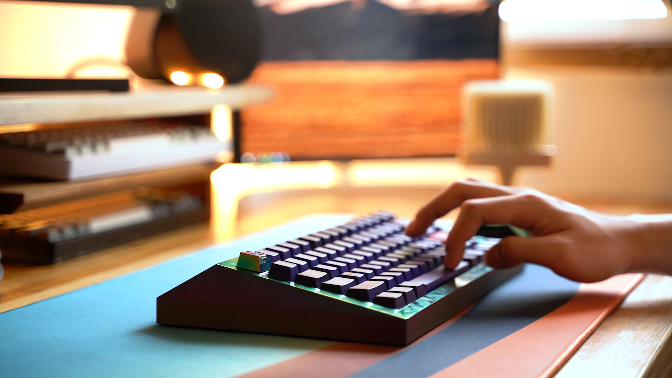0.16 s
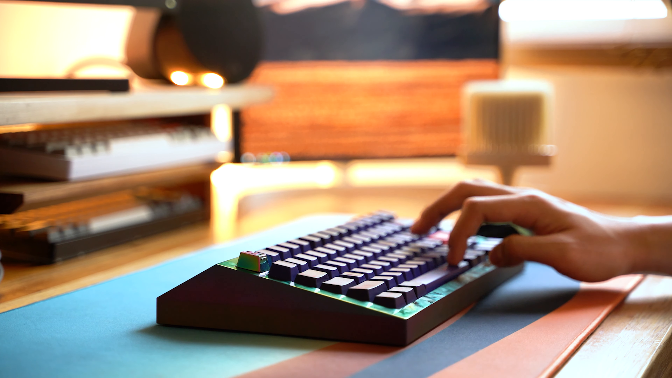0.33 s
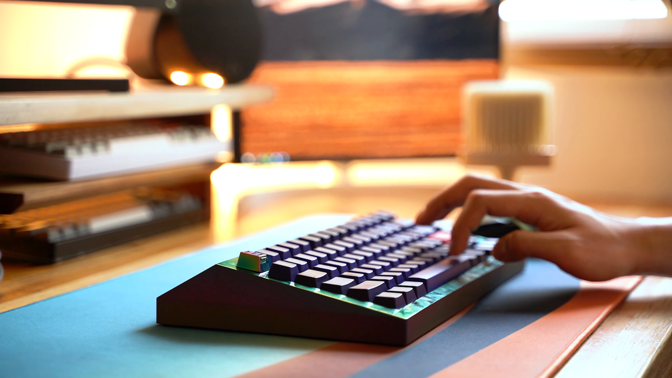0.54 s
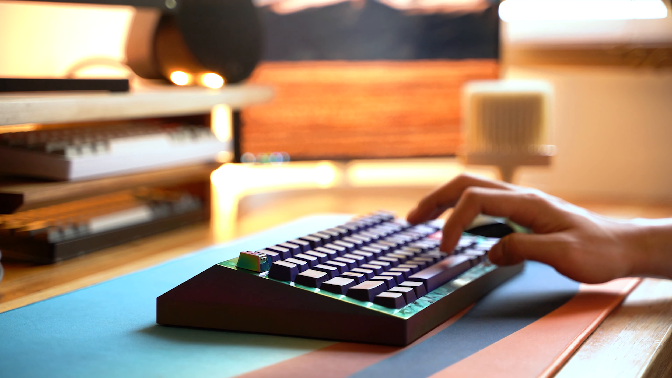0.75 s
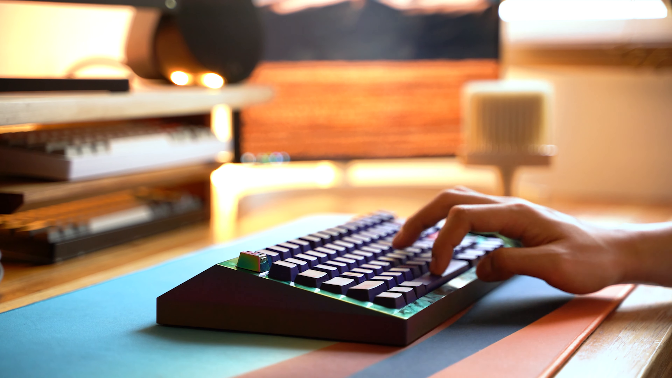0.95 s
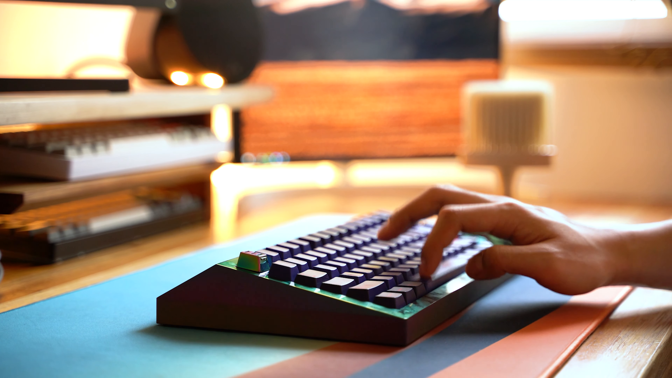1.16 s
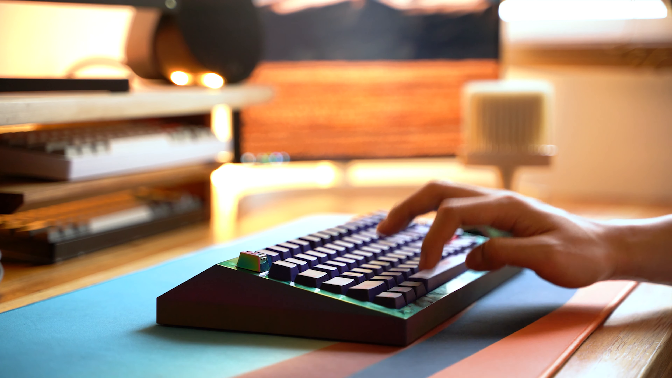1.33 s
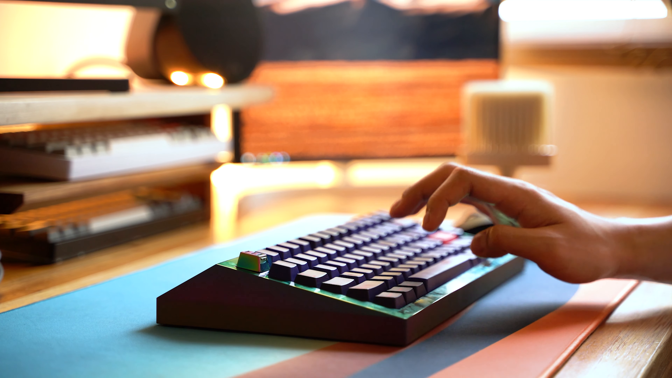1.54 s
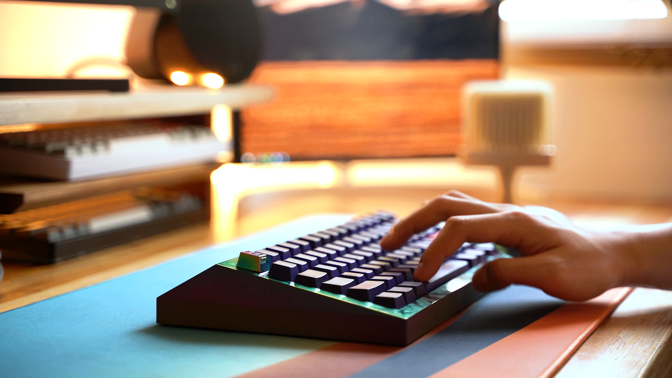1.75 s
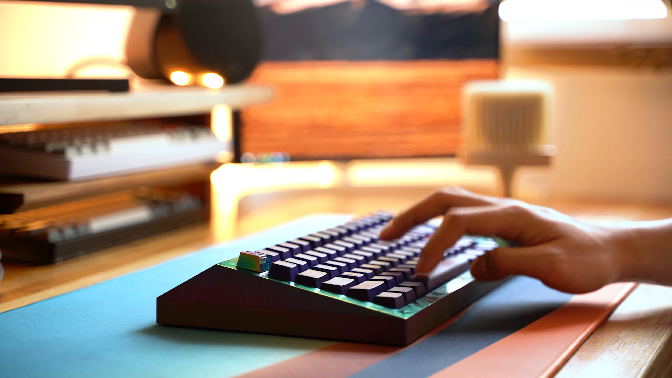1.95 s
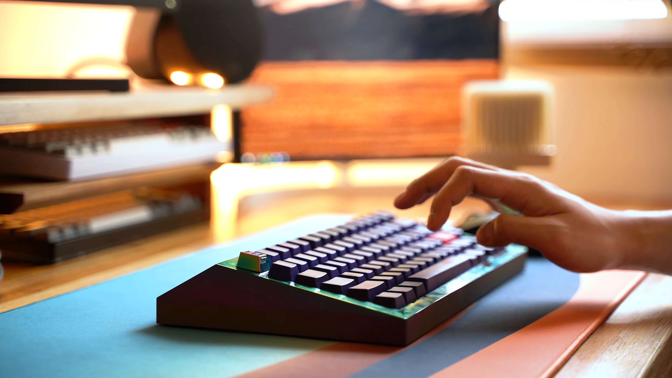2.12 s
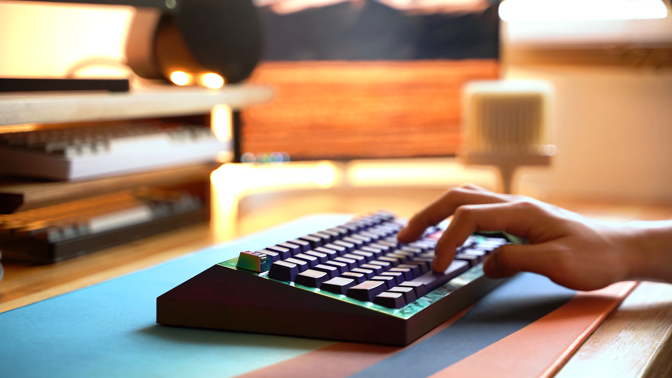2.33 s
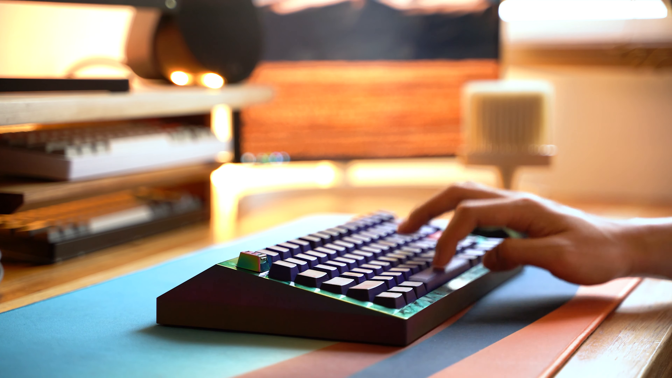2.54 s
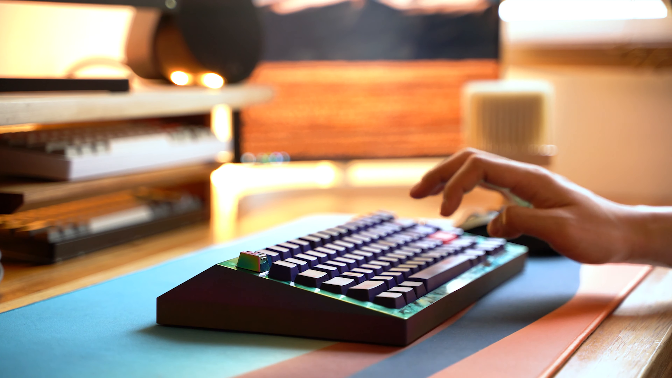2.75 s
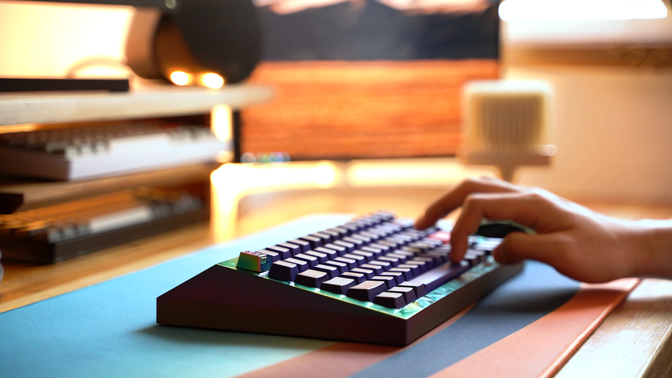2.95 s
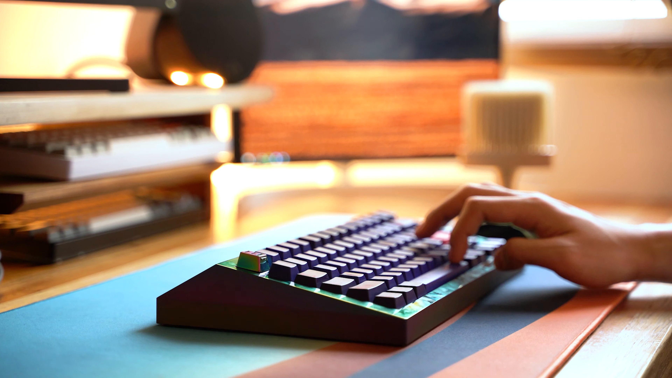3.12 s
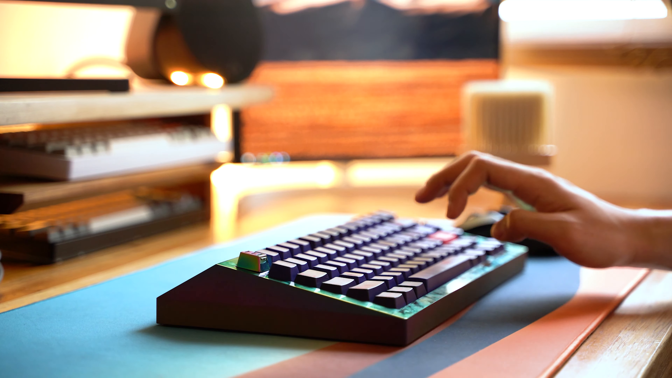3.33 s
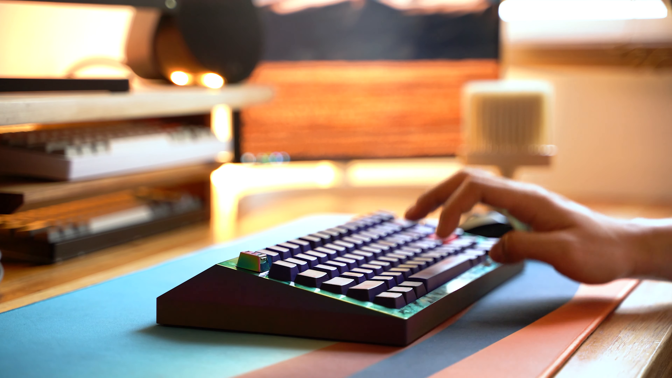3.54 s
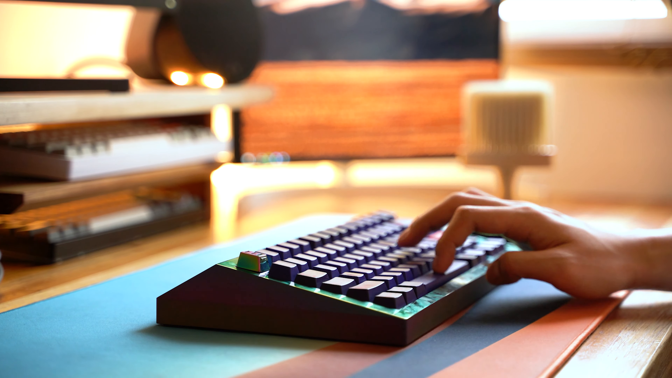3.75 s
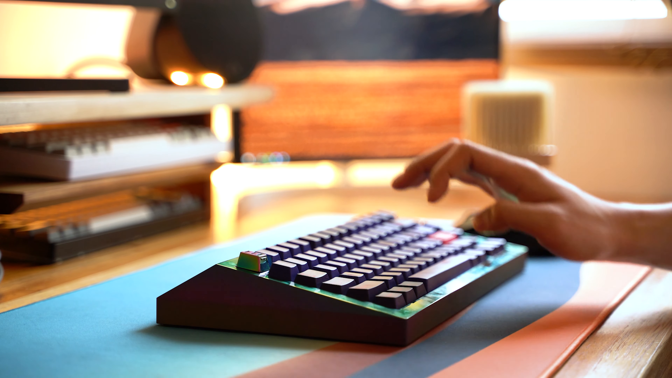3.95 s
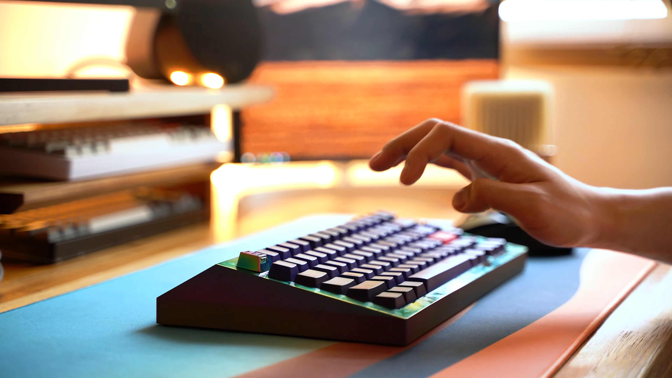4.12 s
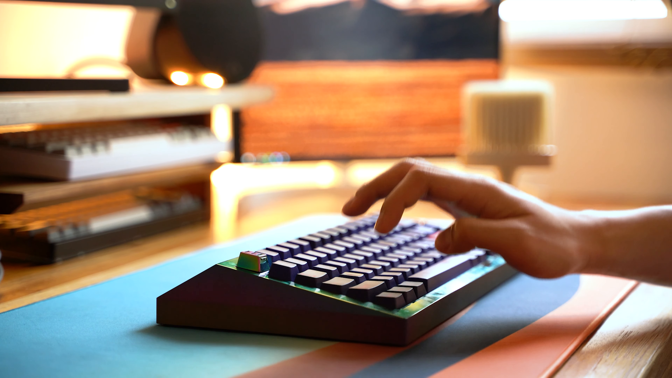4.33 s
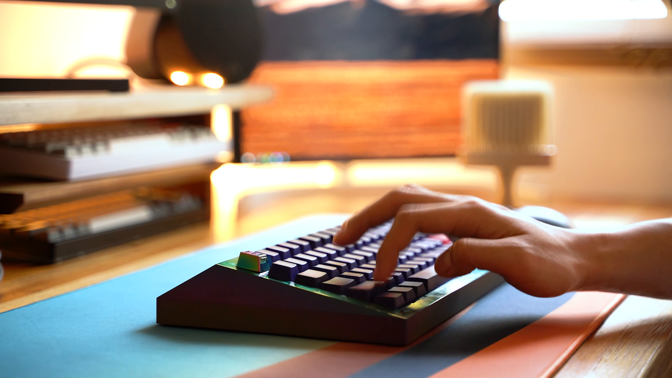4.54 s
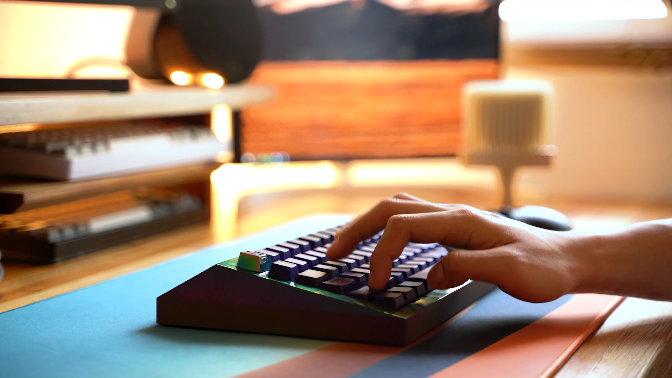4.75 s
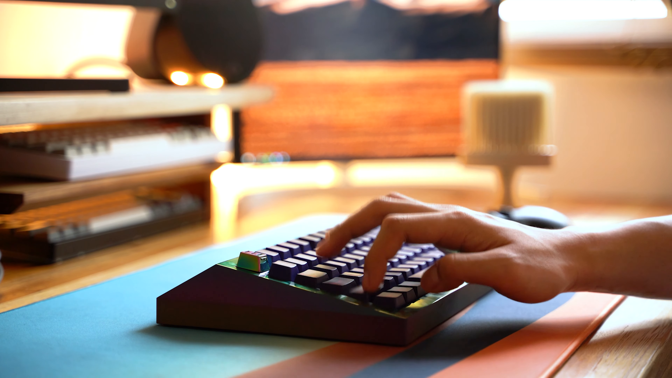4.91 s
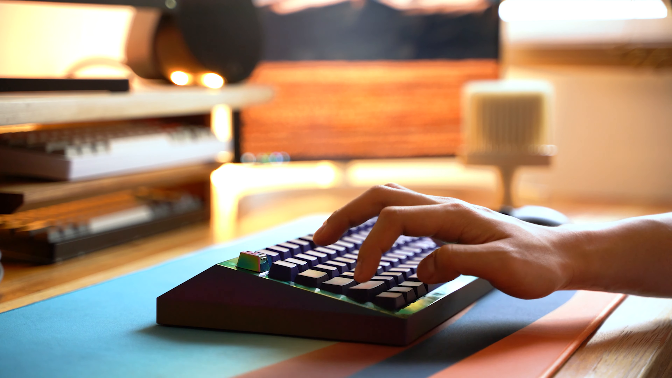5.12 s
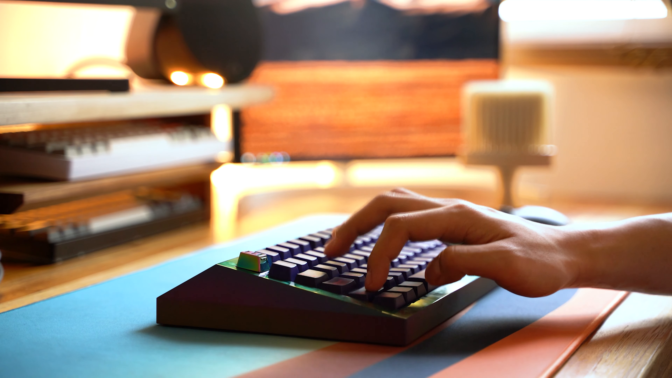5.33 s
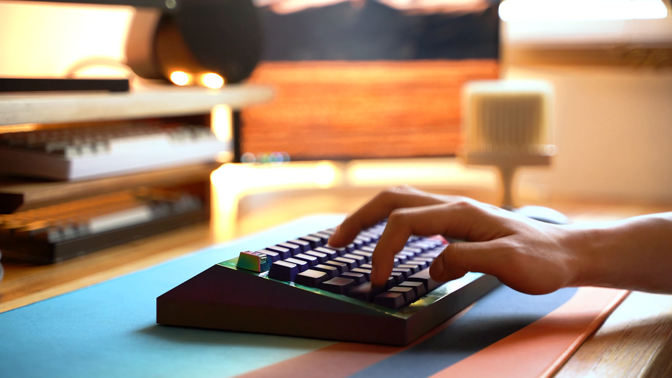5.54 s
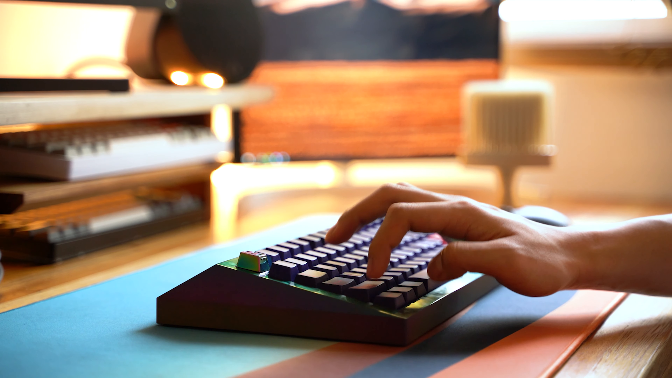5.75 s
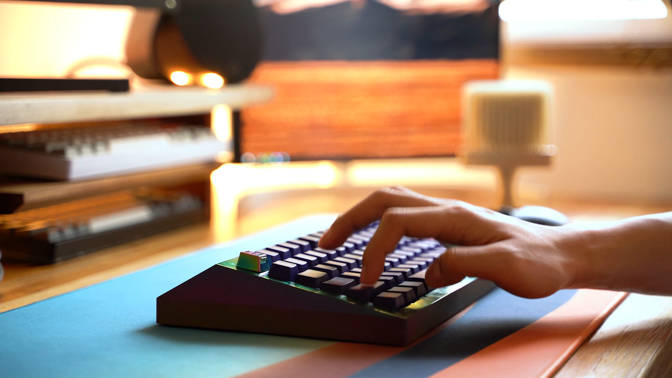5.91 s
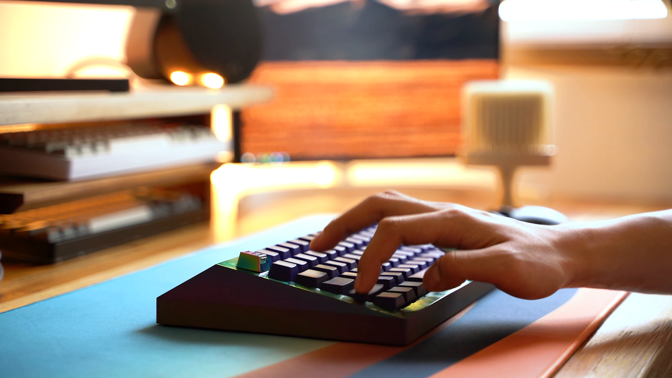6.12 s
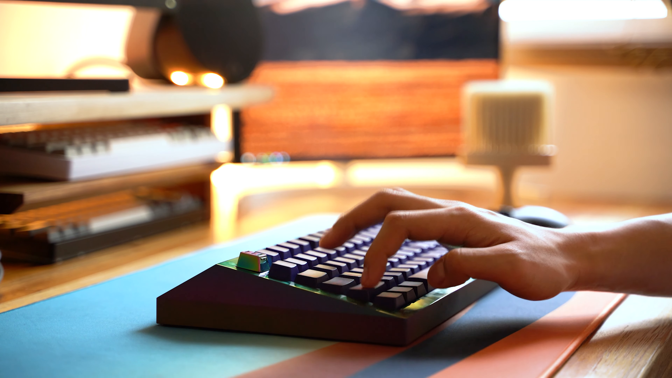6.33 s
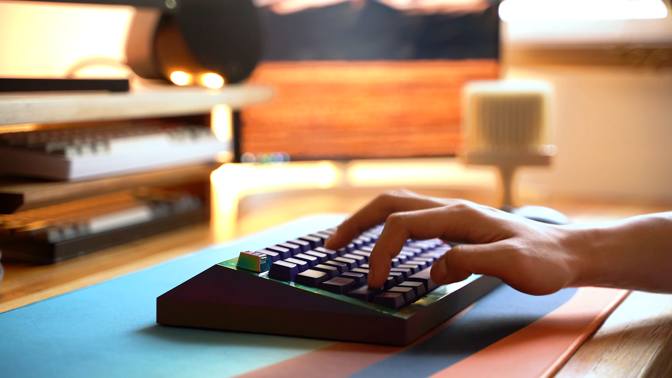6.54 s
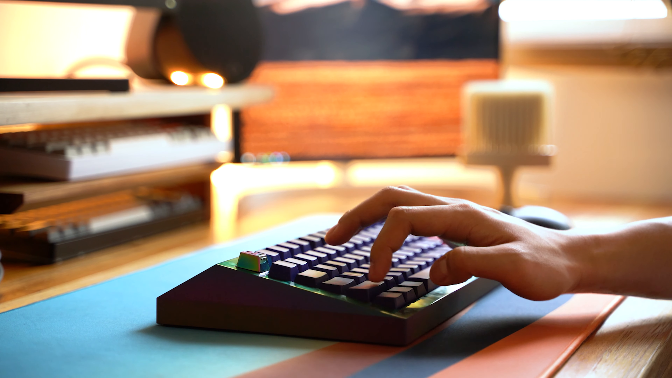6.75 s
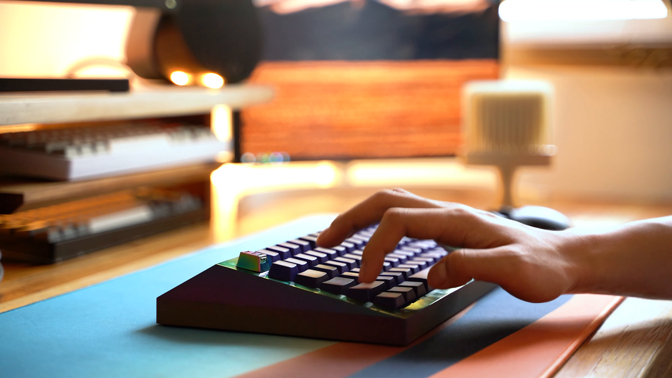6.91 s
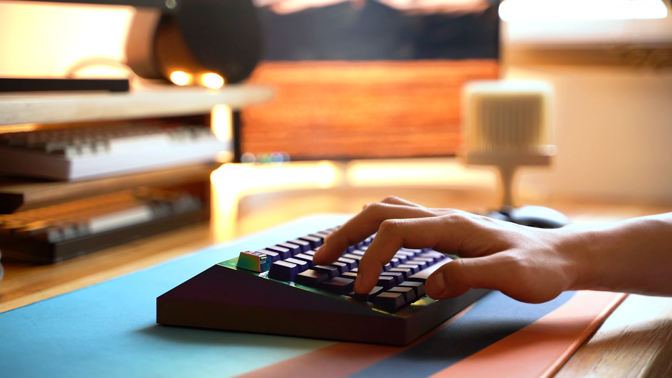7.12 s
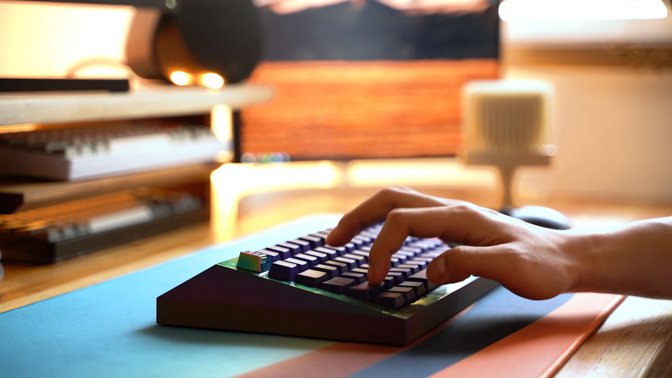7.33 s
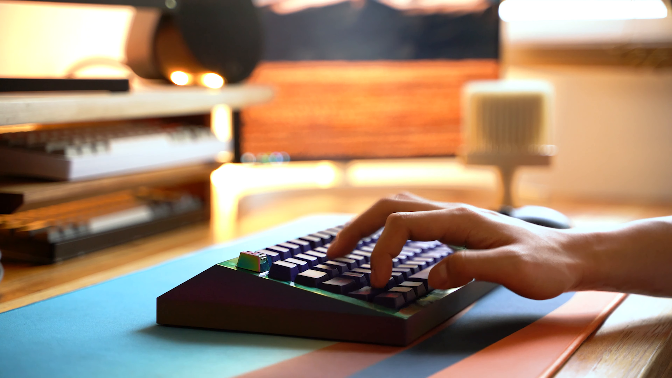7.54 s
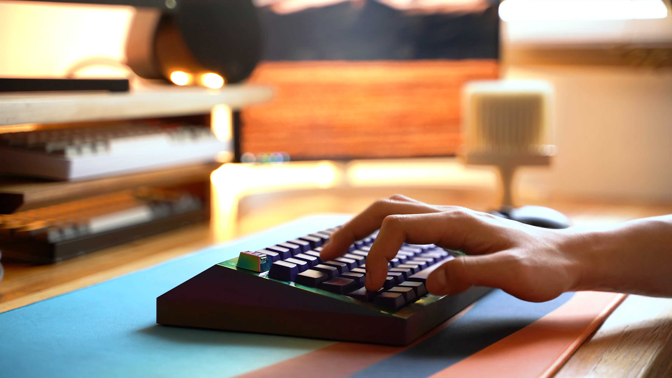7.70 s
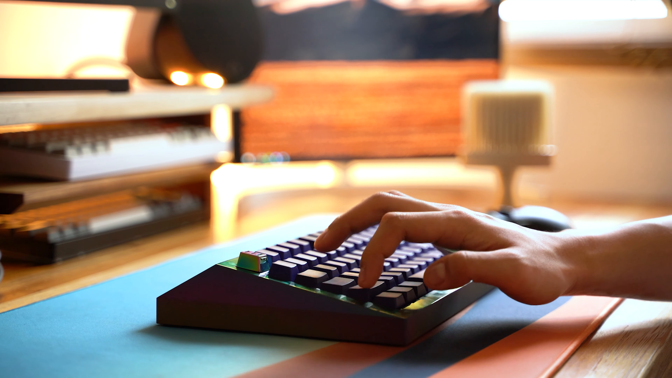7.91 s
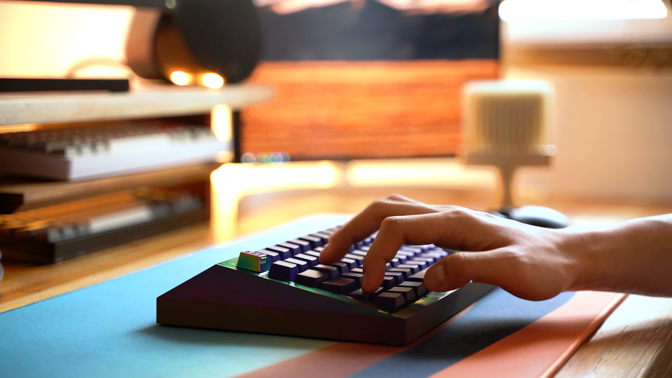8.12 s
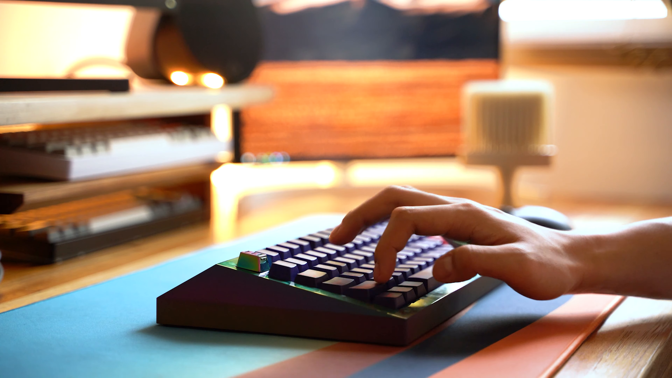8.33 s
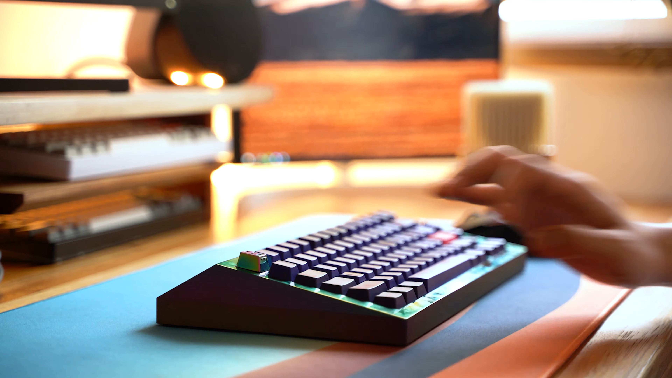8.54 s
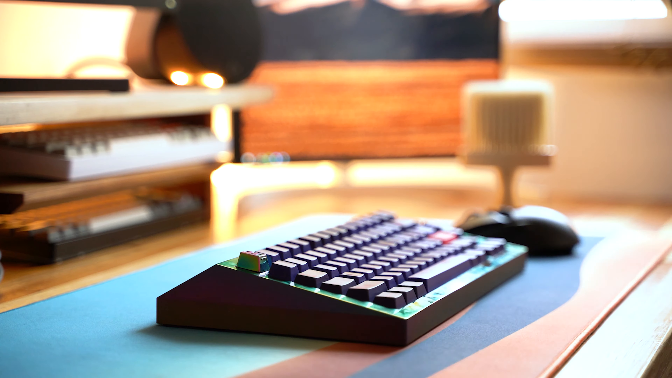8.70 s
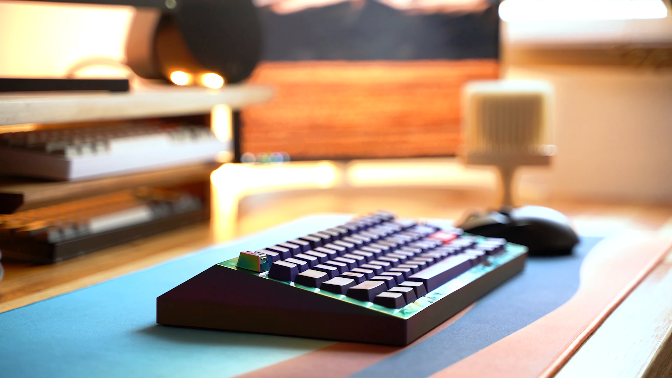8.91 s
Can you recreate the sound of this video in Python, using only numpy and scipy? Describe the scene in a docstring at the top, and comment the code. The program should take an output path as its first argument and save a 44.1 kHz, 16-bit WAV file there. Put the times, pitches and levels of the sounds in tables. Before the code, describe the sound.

Space bar of a mechanical keyboard clacks deeply in quick bursts, then lighter letter keys click in a steady run, close up in a quiet room.

```python
"""A small quiet room: one hand tries out a mechanical keyboard on a desk mat, close to a microphone.
The space bar is tapped in bursts: a deep clack going down, a clack and wire chatter coming up.
Letter keys follow, lighter and brighter, and some springs ping. A fan hums faintly.
Blows excite damped modes (filtered impulses), the stem scratches as a train of grains, springs ring as
narrow-band noise, the fan is shaped noise; an echo and a diffuse tail carry the blows to the microphone."""
import sys
import numpy as np
from scipy import signal
from scipy.fft import rfft, irfft
from scipy.io import wavfile

SR = 44100
rng = np.random.default_rng(int(sys.argv[2]) if len(sys.argv) > 2 else 0)


def materialize(psi):
    """Save the field psi as 16-bit PCM at rate SR to the path in sys.argv[1].

    A 1-D psi becomes a single channel; in a 2-D psi each row is a channel.
    """
    bounded = np.clip(np.atleast_2d(psi).T, -1, 1)
    quanta = np.round(bounded * 32767).astype(np.int16)
    wavfile.write(sys.argv[1], SR, quanta)


N = 395577  # samples in the scene
SIZE = 4096  # samples in one blow
FREQ = np.maximum(np.arange(SIZE // 2 + 1) * SR / SIZE, 1)
LEAD_S = .03  # room left ahead of each landing for the scratch of the stem

# resonances of the space bar on the plate: (f/Hz, width/Hz, level/dB)
BAR_MODES = [(260, 160, -41), (419, 100, -22.5), (713, 280, -24), (1243, 290, -10), (1698, 468, 2),
             (2100, 390, -6.5), (2786, 190, -8), (3423, 400, -9), (4700, 1000, -22.5), (6650, 500, -30),
             (9900, 4900, -34), (13676, 2276, -43.5)]
# taps: (down t/s, strength/dB re usual tap, up t/s, release strength/dB, wire level/dB)
BAR_TAPS = [(-.04, 0.5, 0.044, -9, 8), (0.111, -1, 0.19, 4, 17), (.2778, -1.4, 0.35, -6, 13),
            (0.4325, -3, .504, -10.5, 14), (.5955, -2.5, .6654, -14, 12), (.754, 0.5, .827, 6, 16),
            (.9233, -0.9, 1.0014, -13.5, 6.5), (1.0746, -1, 1.155, -1.5, 14.5),
            (1.2465, 0.5, 1.3097, -10, 13), (1.3893, 1, 1.46, 10, 17.5), (1.857, 3, 1.937, 0.5, 15),
            (2.0238, 2, 2.092, 2, 15.5), (2.44, 2.5, 2.5206, 2.5, 10.5), (2.6059, 1, 2.6841, 2.5, 16),
            (3.0948, -5.5, 3.157, -9, 3), (3.236, -4.5, 3.3218, 9.5, 17.5), (3.7233, 4, 3.8024, 5.5, 13),
            (3.8678, 2, 3.9541, 3, 18.5)]
# once the bar rebounds and knocks against its top stop again: (t/s, level/dB, treble level/dB)
BAR_REBOUND = (2.691, 15.6, -16)


def space_bar():
    """Impact excitation of a bar's modes, at the bottom and at the top of each stroke."""
    out = np.zeros(N)
    path = room(wet_db=-3.5, echo_s=.0048, echo_db=4.5)
    for down, press_db, up, release_db, wire_db in BAR_TAPS:
        add(out, down - LEAD_S, heard(bar_press(press_db), path))
        add(out, up - LEAD_S, heard(bar_release(release_db, wire_db), path))
    s, level_db, treble_db = BAR_REBOUND
    contact_db = level_db + np.array([0, 0, treble_db, treble_db])
    add(out, s, heard(clack(BAR_MODES, contact_db, uneven_db=1.5), path))
    return out


# bar going down; a row each for low body, middle, click, top: (usual level/dB, growth/dB per dB of strength)
BAR_PRESS_VOICE = [(16.5, .4), (16, 1), (18, 1.5), (15, 0.83)]


def bar_press(press_db):
    """Friction, then impact: the stem scratches until the bar lands with a clean clack."""
    stroke = slide(BAR_MODES, level_db=press_db - 12.5, travel_s=0.012, bright_db=12.5)
    landing = clack(BAR_MODES, voiced(BAR_PRESS_VOICE, press_db), detune=0.008, uneven_db=1.35,
                    ring_s=0.0013, dense_hz=4700, thump_db=2.5)
    add(stroke, LEAD_S, landing)
    return stroke


# bar coming up; rows and columns as above: (usual level/dB, growth/dB per dB of strength)
BAR_RELEASE_VOICE = [(20.4, 0.55), (10.7, 0.99), (9.1, .2), (15, .3)]
# the thump of the case follows the force only in part: dB it falls behind the middle per dB of strength
THUMP_LAG = 0.42


def bar_release(release_db, wire_db):
    """Friction, impact and secondary impacts: a scratch, a clack, then the chatter of the loose wire."""
    stroke = slide(BAR_MODES, level_db=-16.5, travel_s=0.021, bright_db=12)
    landing = clack(loaded(BAR_MODES, release_db), voiced(BAR_RELEASE_VOICE, release_db), detune=0.045,
                    uneven_db=1.5, ring_s=0.0026, dense_hz=3223, thump_db=-1.5 - THUMP_LAG * release_db)
    add(stroke, LEAD_S, landing)
    wire_chatter(stroke, release_db, wire_db)
    return stroke


# pitch ratio of the main resonances at a usual release, and its rise per dB of strength
RELEASE_PITCH, RELEASE_PITCH_PER_DB = .94, 0.013
LOADED_FROM_HZ, LOADED_TO_HZ = 1000, 2400  # main resonances, which the finger shifts


def loaded(modes, strength_db):
    """Mass loading: the main resonances follow the release strength; the softer the release, the more the
    finger rides the bar and the lower they sit, while a hard release raises them slightly."""
    pitch = RELEASE_PITCH + RELEASE_PITCH_PER_DB * strength_db
    return [(hz * pitch if LOADED_FROM_HZ < hz < LOADED_TO_HZ else hz, width, db)
            for hz, width, db in modes]


# colour of the steel wire striking its clips: low body, middle, click, top (each level/dB)
WIRE_COLOUR_DB = [-1, -14, -0.5, 0.5]
# mean delay of the wire after a usual release (s), and how much sooner it comes after a harder one (s per dB)
WIRE_DELAY_S, WIRE_SOONER_S_PER_DB = .0043, .00006


def wire_chatter(stroke, release_db, wire_db, spread_s=.002, count=10):
    """Repeated impacts: the stabiliser wire bounces in its clips as ticks, mostly loudest mid-cluster."""
    delay = WIRE_DELAY_S - WIRE_SOONER_S_PER_DB * release_db
    chance = rng.standard_normal((count, 2))
    size = np.exp(-chance[:, 0] ** 2 / 4) * chance[:, 1]
    size = size / np.sqrt(np.sum(size ** 2))
    for offset, gain in zip(spread_s * chance[:, 0], size):
        tick = clack(BAR_MODES, wire_db + np.array(WIRE_COLOUR_DB), uneven_db=3.0, ring_s=.0016)
        add(stroke, LEAD_S + max(delay + offset, 0), gain * tick)


# letter strokes; body is how full the cap sounds, click how sharply it lands, spring how freely its coil
# rings: (down t/s, strength/dB, up t/s, release strength/dB, body/dB, click/dB, spring 0-1)
LETTER_STROKES = [(4.5479, 5, 4.6102, 10, -0.5, -0.5, 0), (4.7026, -.5, 4.7699, 4, 0, -3.5, 0),
                  (4.8408, -2, 4.919, -3, 3.5, -0.5, 0), (4.9924, -8, 5.0687, 4, 3, 4, .9),
                  (5.1583, 4, 5.2313, 1.5, -19, 2.5, 0.6), (5.3162, -1, 5.3806, 4.5, -16, -2, .8),
                  (5.4698, 1, 5.5429, -3.5, 1.5, -7.5, .4), (5.6166, 3, 5.6928, -3, -10.5, 1, 0),
                  (5.7749, 3.7, 5.8459, 1, -9.5, -2, 0), (5.923, 1, 6.0004, -2.5, 2, -0.5, 0.1),
                  (6.0848, 1, 6.155, -32, -21, 0, .6), (6.2181, -4.5, 6.2903, -16.5, -19, -6, 0),
                  (6.3607, -2, 6.4305, -7.5, -21, 5.5, 0.1), (6.5014, -2.5, 6.5705, -6, 6, -9, 0),
                  (6.6403, 4.5, 6.7018, 6, -10.5, 0.5, 0), (6.795, 9.5, 6.8711, -5, -13, 3.5, 0),
                  (6.942, -5, 7.0143, 0, 3.5, 7, .8), (7.0987, 2.5, 7.17, -30, -18, 1, .9),
                  (7.251, 1, 7.3107, 6, -26, -4, 0.15), (7.395, 0, 7.479, -13, 5, -0.5, 0),
                  (7.528, 4, 7.5935, -5, -6, 5, 0), (7.6714, 4, 7.7441, -1.5, -5, 7, 0),
                  (7.8186, -1, 7.8871, -1, 5.5, 0, 0.2), (7.9645, -7, 8.0501, -9.5, -5, 4.5, .5),
                  (8.114, -10, 8.1758, 8.5, -7, 2.5, 0.9), (8.2534, -1, 8.3192, 1.5, 7, -1, 0),
                  (8.403, 1.3, 8.463, -6.5, -4.5, -1, 0), (8.5094, 5.5, 8.5634, 13.5, -5.5, -1, 0)]


def letter_keys(spots=8):
    """Impact excitation of small caps: a click at the bottom of the travel, a duller knock at the top."""
    out = np.zeros(N)
    # each stroke takes one of several paths to the microphone, at random
    paths = [room(wet_db=-2.5, echo_s=.004 + 0.000994 * rng.standard_normal(), echo_db=5.5)
             for _ in range(spots)]
    for down, press_db, up, release_db, body_db, click_db, spring in LETTER_STROKES:
        path = paths[rng.integers(spots)]
        add(out, down - LEAD_S, heard(cap_press(press_db, body_db, click_db), path))
        add(out, up, heard(cap_release(release_db, spring), path))
    faint_ticks(out, paths)
    return out


# resonances of a letter cap on the plate: (f/Hz, width/Hz, level/dB)
LETTER_MODES = [(395, 130, -18), (887, 397, -10.5), (1172, 120, -9), (1939, 462, 3.5), (2763, 132, -1.5),
                (3340, 496, -5.5), (4635, 920, -14), (5160, 260, -23), (5540, 1800, -21), (8850, 1100, -29),
                (12750, 2700, -34)]
# cap going down; a row each for low body, middle, click, top: (usual level/dB, growth/dB per dB of strength)
CAP_PRESS_VOICE = [(2.9, 0.86), (2.8, 0.95), (3.1, 0.86), (6.1, 1)]
# dB gained in low body, middle, click, top per dB of a cap's body, and per dB of its click
BODY_GAIN = [1, 0, 0.083, .33]
CLICK_GAIN = [0, 0, 0.81, 0.43]


def cap_press(press_db, body_db, click_db):
    """Friction, then impact: the stem scratches until the cap clicks at the bottom."""
    stroke = slide(LETTER_MODES, level_db=press_db - 22.5, travel_s=0.012, bright_db=3.5)
    contact_db = voiced(CAP_PRESS_VOICE, press_db)
    contact_db = contact_db + body_db * np.array(BODY_GAIN) + click_db * np.array(CLICK_GAIN)
    landing = clack(LETTER_MODES, contact_db, detune=0.024, uneven_db=1.16, ring_s=0.00086,
                    dense_hz=4190, thump_db=-1 - THUMP_LAG * press_db)
    add(stroke, LEAD_S, landing)
    return stroke


# cap coming up; rows and columns as above: (usual level/dB, growth/dB per dB of strength)
CAP_RELEASE_VOICE = [(3.5, 0.62), (0, 1), (-9, 0.92), (-3, 1)]
FREE_SPRING_TOP_DB = -7  # a switch whose spring rings freely closes with a duller top


def cap_release(release_db, spring, settle_s=0.00211, settle_db=-10):
    """Impact with rebound: the cap knocks at the top and settles with one small bounce."""
    contact_db = voiced(CAP_RELEASE_VOICE, release_db)
    contact_db = contact_db + spring * np.array([0, 0, 0, FREE_SPRING_TOP_DB])
    knock = clack(LETTER_MODES, contact_db, detune=0.029, uneven_db=0.54, ring_s=0.0009,
                  dense_hz=3330, thump_db=0.8 - THUMP_LAG * release_db)
    # the bounce follows 1 to 1.5 times settle_s later
    add(knock, settle_s * (1 + rng.random() / 2), undb(settle_db) * knock)
    return knock


# faint ticks, perhaps of a fingertip, just before a key or the space bar moves: (t/s, level/dB)
FAINT_TICKS = [(3.151, -6), (4.54, -13), (4.682, -16), (4.823, -15), (5.448, -19), (6.615, -21),
               (6.783, -15)]
TICK_TREBLE_DB = -3


def faint_ticks(out, paths):
    """Soft impact: a faint tick excites the modes of a cap with less treble."""
    for s, db in FAINT_TICKS:
        contact_db = db + TICK_TREBLE_DB * np.array([0, 0, 1, 1])
        tick = clack(LETTER_MODES, contact_db, ring_s=0.0018, dense_hz=1200)
        add(out, s, heard(tick, paths[rng.integers(len(paths))]))


SPRING_HZ, SPRING_WIDTH_HZ, SPRING_T60_S = 5120, 130, 0.14  # band in which the coils ring
PING_DB, PING_GROWTH = -62, .3  # level of a free spring after a usual blow, dB gained per dB of strength


def springs():
    """Modal density: a coil's many close modes ring on as decaying narrow-band noise after each blow."""
    out = np.zeros(N)
    t = np.arange(SR // 2) / SR
    freq = np.maximum(np.arange(len(t) // 2 + 1) * SR / len(t), 1)
    band = resonance(freq, SPRING_HZ, SPRING_WIDTH_HZ)
    decay = np.exp(-np.log(1000) * t / SPRING_T60_S)
    for down, press_db, up, release_db, _, _, spring in LETTER_STROKES:
        for s, strength_db in (down, press_db), (up, release_db):
            shimmer = irfft(rfft(rng.standard_normal(len(t))) * band, len(t))
            size = np.clip(spring, 0, 1) * undb(PING_DB + PING_GROWTH * strength_db)
            add(out, s, size * shimmer / np.std(shimmer) * decay)
    return out


def slide(modes, level_db, travel_s, bright_db, low_db=5, count=90):
    """Friction as random micro-impacts: the stem scratches along its housing until it lands at LEAD_S."""
    grains = np.zeros((1, 2 * SIZE))
    when = LEAD_S - min(travel_s, LEAD_S) * rng.random(count)
    grains[0, (when * SR).astype(int)] = rng.laplace(size=count) / np.sqrt(2 * count)
    scratch = clack(modes, level_db + np.array([low_db, 0, bright_db, bright_db]))
    return signal.fftconvolve(grains, scratch, axes=1)[:, :2 * SIZE]


def voiced(voice, strength_db):
    """Force-dependent spectrum: levels of low body, middle, click and top for a blow of a given strength."""
    return np.array([db + growth * strength_db for db, growth in voice])


# centres of case thump, low body, middle, click and top of a contact: (each f/Hz)
CONTACT_CENTRES = [430, 750, 1700, 4500, 11000]


def clack(modes, contact_db, detune=.02, uneven_db=4.5, ring_s=.0012, dense_hz=3500, thump_db=0):
    """Source-filter blow: contact spectrum times modes, as a row for the direct path and one for the tail."""
    chance = rng.standard_normal((len(modes), 2))
    # the modes shift a little with the spot that is hit
    body = 0
    for (hz, width, db), (a, b) in zip(modes, chance):
        body = body + undb(db + uneven_db * a) * resonance(FREQ, hz * (1 + detune * b), width)
    # the thump of the case is set relative to the middle
    contact = colour(FREQ, CONTACT_CENTRES, [contact_db[1] + thump_db, *contact_db])
    # minimum phase: the energy comes as early as the spectrum allows
    cepstrum = irfft(np.log(body * contact + 1e-7))
    cepstrum[1:SIZE // 2] *= 2
    cepstrum[SIZE // 2 + 1:] = 0
    blow = irfft(np.exp(rfft(cepstrum)))
    # above dense_hz the plastic has countless close modes, which ring like a very short burst of noise
    ring = rng.standard_normal(SIZE) * np.exp(-np.arange(SIZE) / SR / ring_s)
    ring = ring / np.linalg.norm(ring)
    low = signal.lfilter(*signal.butter(3, dense_hz, "low", fs=SR), blow)
    high = signal.lfilter(*signal.butter(3, dense_hz, "high", fs=SR), blow)
    return np.array([low + signal.fftconvolve(high, ring)[:SIZE], blow])


# colour of the echo off the screen behind the keyboard: (f/Hz, level/dB)
SCREEN_ECHO = [(400, -6.5), (1700, -24), (8000, -24.5)]
# reverberation, before the wet level of each path: (f/Hz, level/dB, t60/s)
REVERB = [(200, 1.5, 0.64), (500, -7, .26), (1000, -9, 0.17), (1800, -13.5, .27), (2700, -11, 0.18),
          (3660, -12, .23), (7000, -7, .21), (14000, -6, 0.18)]


def room(wet_db, echo_s, echo_db, build_s=0.0065):
    """Reflection and reverberation: direct sound with a dull echo off the screen, and a diffuse tail."""
    t = np.arange(4 * SIZE) / SR
    freq = np.arange(len(t) // 2 + 1) * SR / len(t)
    delay = np.exp(-2j * np.pi * freq * echo_s)
    direct = irfft(1 + undb(echo_db) * colour(freq, *np.transpose(SCREEN_ECHO)) * delay)
    noise = rfft(rng.standard_normal(len(t)))
    tail = 0
    for (_, db, t60), band in zip(REVERB, np.eye(len(REVERB))):
        share = np.interp(freq, [row[0] for row in REVERB], band)  # triangular band around its centre
        fade = np.exp(-np.log(1000) * t / t60) * (1 - np.exp(-(t / build_s) ** 2))
        tail = tail + undb(db + wet_db) * irfft(noise * share) * fade / np.linalg.norm(fade)
    # a smooth window closes the direct path
    return np.array([direct * np.exp(-(t / LEAD_S) ** 2), tail])


def heard(stroke, paths):
    """Superposition: a stroke convolved with both paths and summed."""
    return signal.fftconvolve(stroke, paths, axes=1).sum(axis=0)


# fan and air: (f/Hz, level/dB per Hz)
AIR_NOISE = [(25, -118), (50, -109), (85, -109), (133, -88.5), (175, -96.5), (225, -91), (310, -100),
             (600, -104), (850, -104), (1700, -110), (4000, -121), (8000, -125), (15000, -130)]
# hum of mains and fan: (f/Hz, width/Hz, level/dB)
HUM_BANDS = [(59.2, 1.5, -93.5), (209, 15, -73.5)]


def fan():
    """Stationary noise: soft air of a shaped spectrum, with two narrow bands as hum."""
    freq = np.maximum(np.arange(N // 2 + 1) * SR / N, 1)
    gain = colour(freq, *np.transpose(AIR_NOISE)) * np.sqrt(SR / 2)  # density per Hz to gain on white noise
    out = irfft(rfft(rng.standard_normal(N)) * gain, N)
    for hz, width, db in HUM_BANDS:
        hum = irfft(rfft(rng.standard_normal(N)) * resonance(freq, hz, width), N)
        out += undb(db) * hum / np.std(hum)
    return out


def undb(db):
    """Logarithmic level: decibels to amplitude gain."""
    return 10 ** (np.asarray(db) / 20)


def colour(freq, hz, db):
    """Spectral envelope: gain through (f/Hz, level/dB) points on a log-frequency axis."""
    return undb(np.interp(np.log(np.maximum(freq, 1)), np.log(hz), db))


def resonance(freq, hz, width):
    """Damped resonance: gain of a band-pass of the given width applied twice, without phase."""
    return 1 / (1 + ((freq / hz - hz / freq) * hz / width) ** 2)


def add(track, s, sound):
    """Superposition: mix a sound into a track at s seconds, cut at the ends of the track."""
    start = int(s * SR)
    sound, start = sound[..., max(-start, 0):], max(start, 0)
    track[..., start:start + sound.shape[-1]] += sound[..., :max(track.shape[-1] - start, 0)]


def scene():
    """Superposition of keyboard and fan at one microphone."""
    return (space_bar() + letter_keys() + springs() + fan())[None]


# equaliser notches in the microphone channel: (f/Hz, width/Hz)
MIC_NOTCHES = [(500, 251), (2390, 1090), (2950, 190), (3130, 370)]
TOP_HZ = 16300


def record(dry):
    """Linear filtering: equaliser notches hollow the sound and a steep low-pass cuts its top."""
    for hz, width in MIC_NOTCHES:
        dry = signal.lfilter(*signal.iirnotch(hz, hz / width, SR), dry)
    return signal.sosfilt(signal.ellip(8, .2, 70, TOP_HZ, fs=SR, output="sos"), dry)


dry = scene()
out = record(dry)
materialize(out)
```